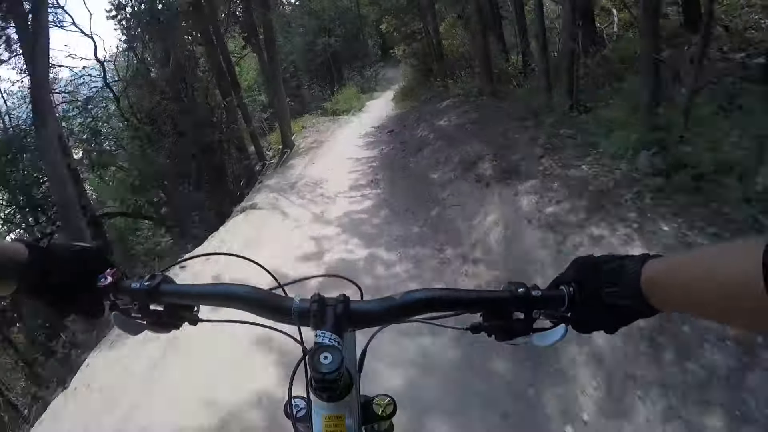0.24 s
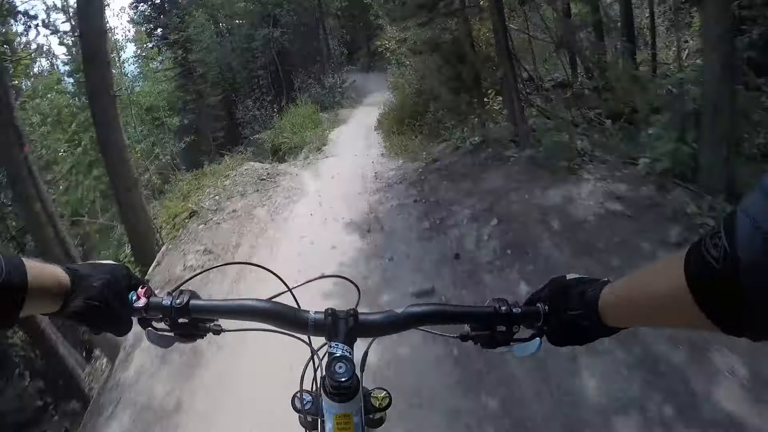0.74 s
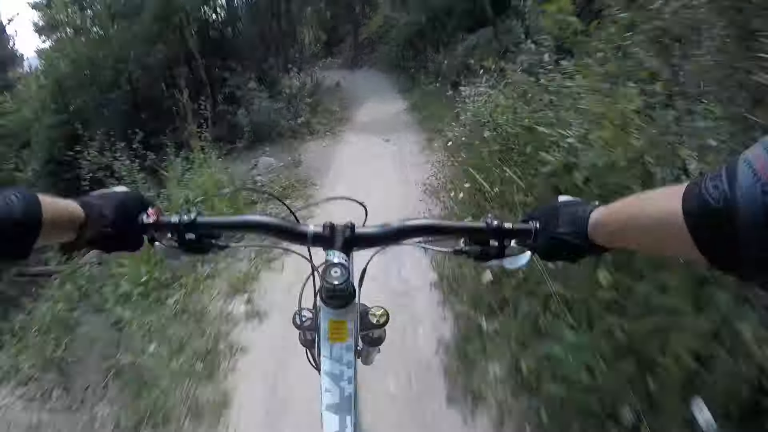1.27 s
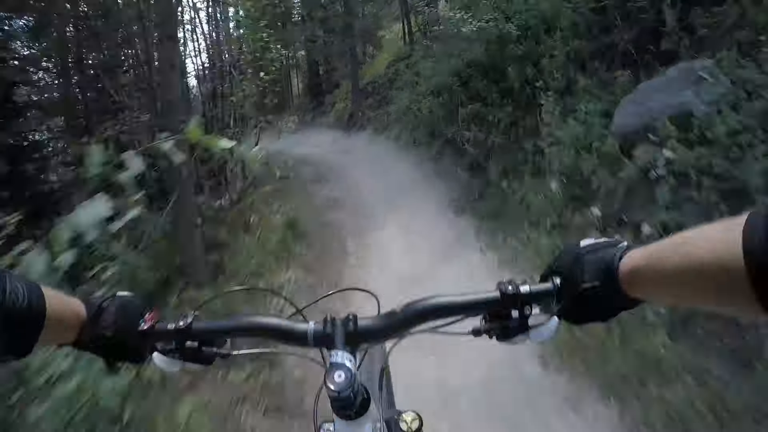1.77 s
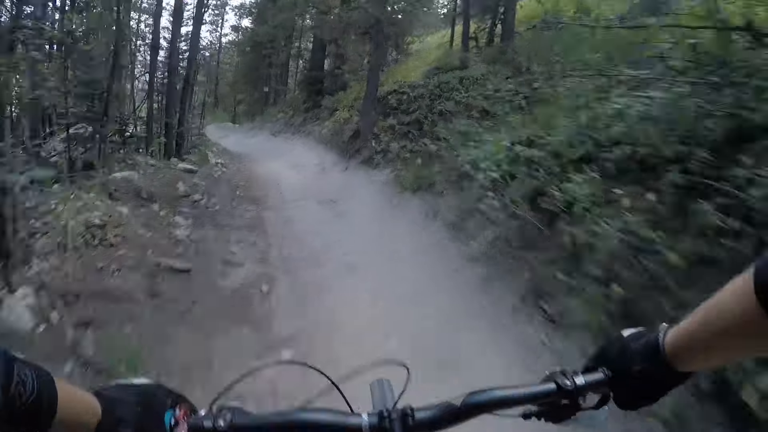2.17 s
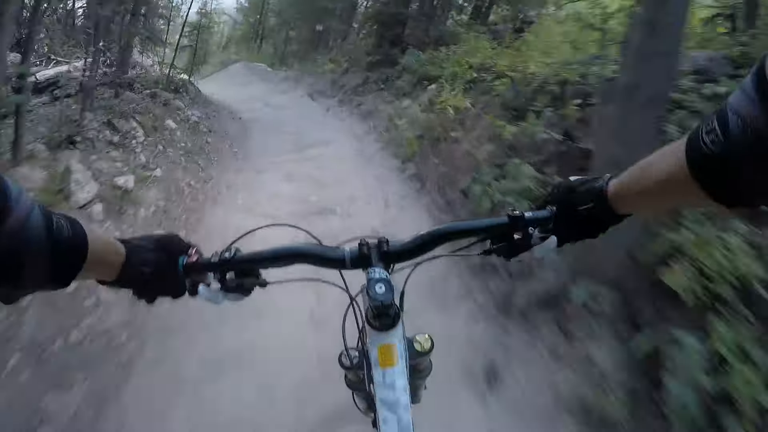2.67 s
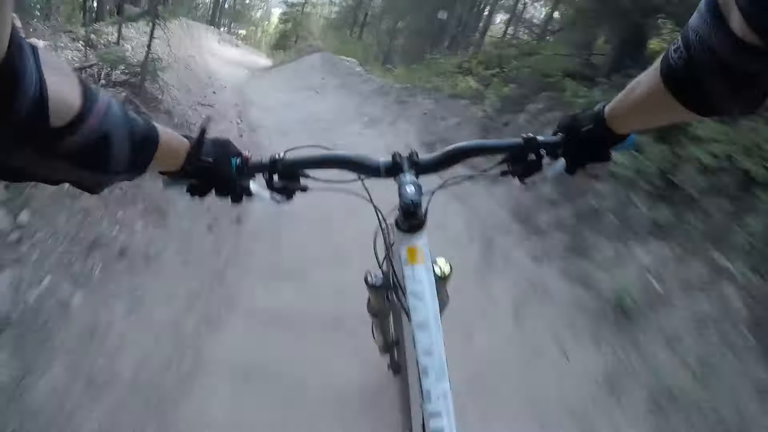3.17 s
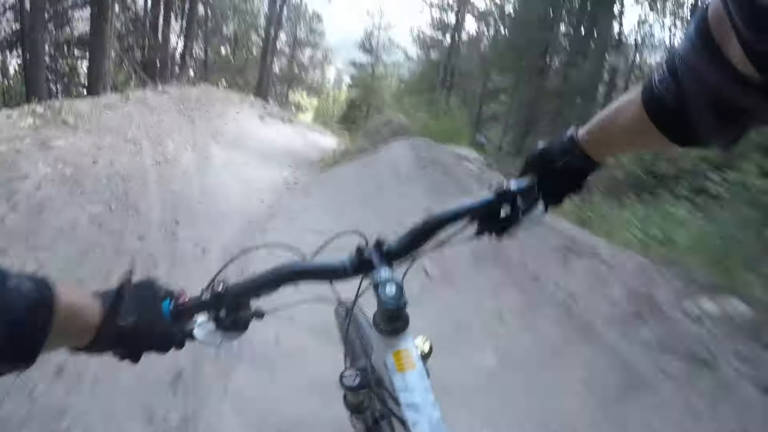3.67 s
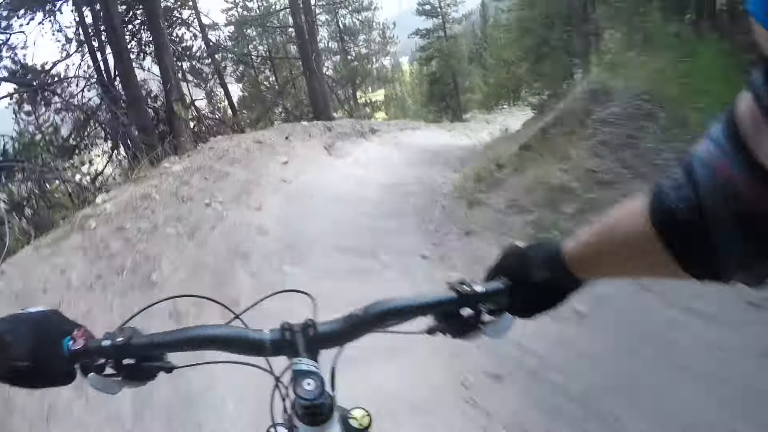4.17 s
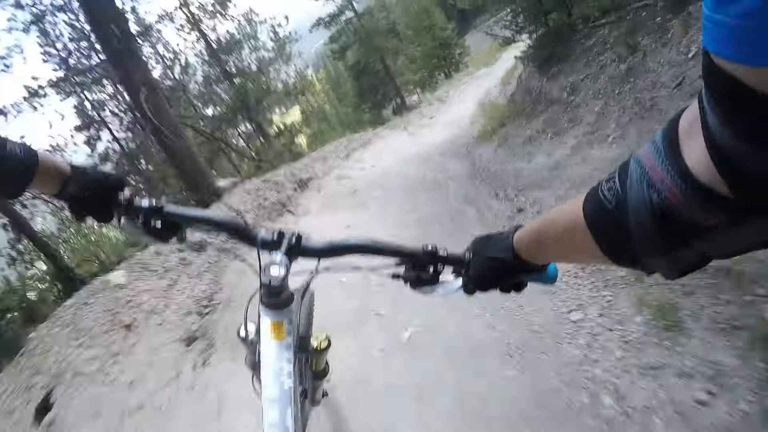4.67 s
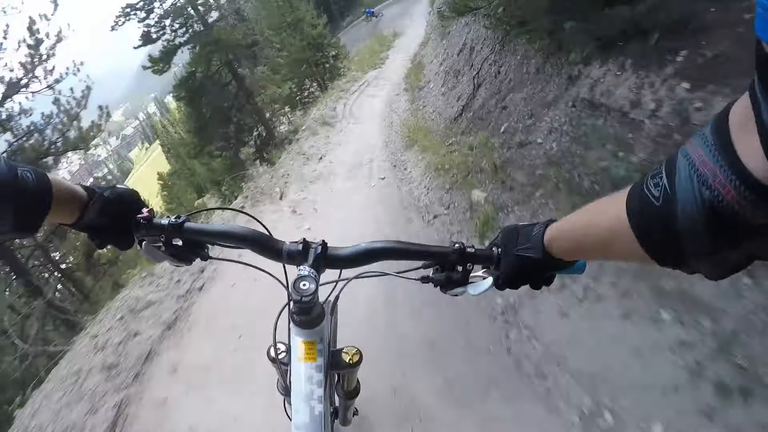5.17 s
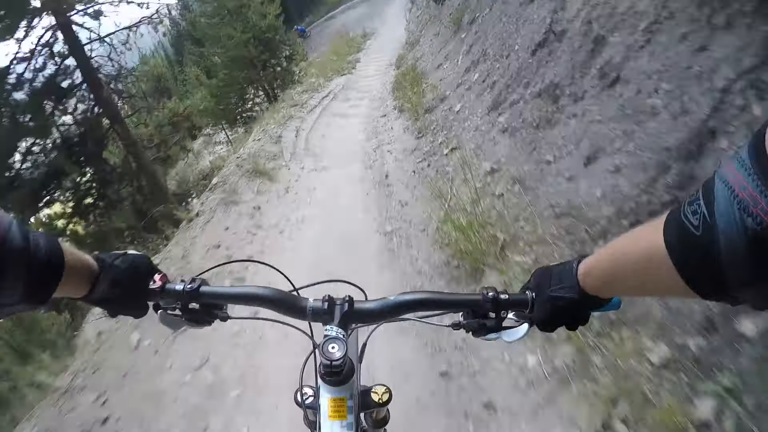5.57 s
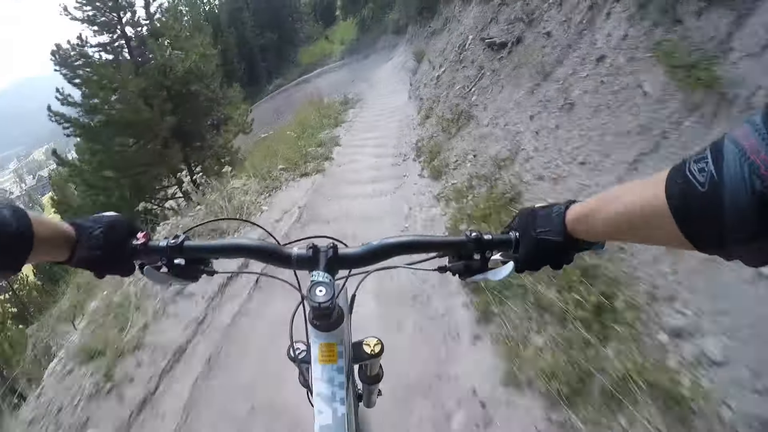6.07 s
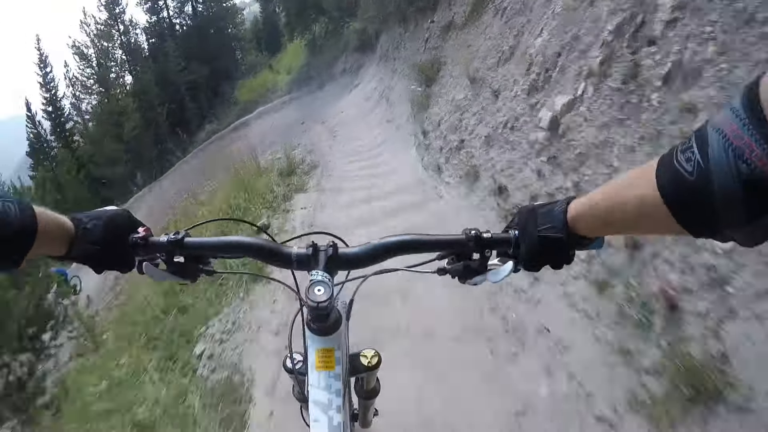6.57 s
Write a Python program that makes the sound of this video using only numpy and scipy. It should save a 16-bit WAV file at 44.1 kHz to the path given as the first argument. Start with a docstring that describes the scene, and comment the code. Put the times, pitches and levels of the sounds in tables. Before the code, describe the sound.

A mountain bike runs fast down a dirt trail, heard from a cased camera on the rider's chest. Shaking and wind rumble on the microphone while the tyres crunch over grit. Bumps make the chain rattle and the parts clack. Early on, a short hop ends in a heavy thump and a brief lull. The clatter then returns, with one especially hard clack, and the wind rises at the end.

```python
"""A mountain bike runs fast down a dirt trail, heard from a cased camera on the rider's chest.
From the start, body shake and air rumble on the case and the tyres crunch over grit.
Bumps clack the bike's parts, rattle the chain, knock the camera mount and jolt the rider.
The tyres go quiet in a short hop at 1.5 s; the landing thumps into overload at 1.8 s, then a lull.
Rough ground resumes by 2.7 s, the hardest clack comes at 4.7 s, and the air rush rises at the end."""
import sys
import numpy as np
from scipy import signal
from scipy.fft import rfft, irfft, next_fast_len
from scipy.io import wavfile
from scipy.ndimage import map_coordinates

SR = 44100
rng = np.random.default_rng(int(sys.argv[2]) if len(sys.argv) > 2 else 0)


def unload_wav(signal):
    """Save mono or channel-first audio to the path in sys.argv[1] as 16-bit WAV at rate SR, clipped to [-1, 1]."""
    wavfile.write(
        sys.argv[1],
        SR,
        np.round(np.clip(np.atleast_2d(signal).T, -1, 1) * 32767).astype(np.int16),
    )


N = 300762

# tyre bite and looseness of the gravel: t/s, bite/dB, loose/dB
TRAIL = [(0.0, 0, 2.5), (0.2, -7, 2.5), (0.8, -1, 0), (1.05, -5.5, 1.5), (1.2, 2, 1), (1.35, 5, -4),
         (1.49, -8.5, 0), (1.75, 6.5, -2), (1.98, -7, -4.5), (2.6, -3, 2.5), (2.79, 5.5, 2), (3.1, 1, 3),
         (3.28, 8, -3.5), (3.45, 0.5, 2), (4.49, -1, -0.5), (4.63, 7, -4.5), (4.86, -1.5, 0.5),
         (5.08, 2.5, -0.5), (5.34, -4, -0.5), (5.68, -3, 2), (6.1, -1.5, -1), (6.52, 4, 4), (6.82, 5, 1.5)]
# bumps that swing the rider's chest: t/s, level/dB
BUMPS = [(0.01, -15), (0.49, -19), (0.87, -17.5), (1.22, -11.5), (1.62, -14), (1.79, -7.5), (2.35, -18),
         (2.72, -7), (3.13, -9.5), (3.25, -7.5), (3.48, -14), (3.67, -8.5), (3.89, -21), (4.14, -10),
         (4.27, -22), (4.59, -9.5), (4.72, -9), (4.98, -9), (5.22, -13.5), (5.57, -12.5), (5.79, -21),
         (5.98, -13.5), (6.17, -20.5), (6.29, -11.5), (6.43, -5.5), (6.56, -13), (6.78, -5)]
# gusts on the case: t/s, level/dB
GUSTS = [(1.16, -18.5), (1.29, -25), (1.78, -9.5), (2.35, -31.5), (2.8, -19.5), (3.13, -21), (3.8, -37),
         (4.46, -26.5), (4.59, -23.5), (4.98, -26), (5.74, -26), (5.87, -24.5), (6.12, -32.5), (6.4, -26),
         (6.81, -22)]
# air rush past the case: t/s, level/dB
AIR_RUSH = [(0.0, -48), (1.3, -49.5), (1.8, -48.5), (1.99, -63.5), (2.4, -50), (2.76, -44.5), (2.98, -49),
            (5.1, -50), (5.3, -45), (6.66, -46.5), (6.82, -37)]
# tyre scuffs: centre t/s, length/s, boost/dB
SCUFFS = [(1.707, 0.059, 6.5), (2.678, 0.016, 5), (3.063, 0.038, 5), (3.204, 0.018, 8)]
# cables and stones on the frame: t/s, level/dB, f/Hz, crack level/dB
CLACKS = [(0.045, -37, 2060, -43), (1.2271, -15.5, 1970, -48), (1.258, -27, 2060, -56),
          (1.357, -24, 2070, -50), (1.427, -33, 1730, -50), (1.7875, -20.5, 2150, -21.5),
          (1.838, -21, 1890, -39), (1.8972, -25.5, 1910, -40), (1.9637, -45, 1720, -49.5),
          (2.7512, -24, 2020, -39), (2.8378, -27, 1960, -37), (3.035, -33, 1740, -37),
          (3.1557, -22, 1970, -40), (3.2226, -23.5, 1670, -40), (3.2666, -17, 1750, -34),
          (3.3662, -24, 2030, -38), (3.4535, -25, 2500, -42), (3.5702, -27.5, 2240, -46),
          (3.8338, -26.5, 2060, -45), (3.906, -34, 1760, -54), (4.288, -27, 1860, -56),
          (4.5215, -22.5, 1860, -62), (4.6339, -21.5, 1950, -48), (4.7016, -2, 1950, -19),
          (4.779, -23, 1900, -41.5), (5.043, -19.5, 2130, -37), (5.3347, -37, 1900, -59)]
# chain slaps: t/s, level/dB, jingle level/dB
CHAIN_SLAPS = [(0.2457, -31.5, -51), (0.897, -26.5, -44.5), (1.6925, -20.5, -43.5), (1.8786, -44, -45.5),
               (1.928, -33, -66), (2.7037, -23, -44), (2.7678, -19, -35.5), (2.8261, -23.5, -52),
               (2.8993, -29, -46), (3.038, -28, -44), (3.276, -18, -36), (3.304, -13, -31),
               (3.356, -18.5, -41), (3.3936, -30, -42), (3.5184, -31.5, -44), (3.7667, -22, -47),
               (3.846, -27.5, -49.5), (4.0765, -31, -48.5), (4.24, -33, -53), (4.5592, -30, -50),
               (4.8389, -32, -48), (5.022, -24.5, -54), (5.1874, -28, -49), (5.884, -39, -52.5),
               (6.1435, -30, -47), (6.341, -17.5, -37.5), (6.418, -20.5, -40), (6.4422, -18.5, -40),
               (6.4705, -18.5, -38), (6.4955, -8, -35), (6.538, -15, -34), (6.6187, -24.5, -48),
               (6.6998, -21, -42), (6.779, -22.5, -38.5)]
# camera mount knocks: t/s, level/dB, f/Hz, body level/dB
KNOCKS = [(0.646, -20.5, 835, -30.5), (1.117, -37, 990, -43), (1.146, -26.5, 824, -30),
          (1.273, -17.5, 934, -23), (1.318, -26.5, 814, -31), (1.686, -28.5, 1150, -38.5),
          (1.708, -25, 1230, -33), (1.742, -17.5, 840, -43), (1.749, -18, 1060, -45),
          (1.782, -12.5, 1080, -19.5), (1.786, -18, 1000, -17), (2.003, -43, 1140, -54),
          (3.543, -45, 785, -40.5), (4.121, -34, 840, -37.5), (4.202, -24, 900, -33),
          (4.683, -31.5, 1150, -34.5), (4.702, -42, 795, -30.5), (4.769, -27.5, 840, -33),
          (4.819, -28, 930, -45), (4.941, -30.5, 1060, -38.5), (5.032, -29.5, 1130, -38),
          (5.07, -16.5, 950, -34), (5.127, -28, 1030, -34), (5.442, -28, 896, -44),
          (5.599, -29.5, 890, -45), (6.2, -20.5, 930, -45), (6.309, -23, 920, -42), (6.681, -24, 920, -40)]
# jolts of the rider's body: t/s, level/dB, start f/Hz
JOLTS = [(0.839, -14, 39.7), (1.281, -20, 129), (1.758, -11, 192), (1.784, -1.5, 81.5), (2.81, -6.5, 66),
         (2.863, -29.5, 170), (4.709, -5.5, 36.4)]

# noise spectra of body shake, air, tyres and contact cracks: f/Hz, level/dB
SHAKE_SPECTRUM = [(8, -13), (15, -2.5), (23, 4), (32, -6), (48, -14.5), (65, -17), (100, -11), (200, -63)]
BUFFET_SPECTRUM = [(30, -36), (55, 8), (75, -3), (110, -4), (160, -23), (260, -22)]
WIND_SPECTRUM = [(60, -21), (120, 2.5), (190, -1.5), (300, -11), (450, -14.5), (700, -20), (1500, -26),
                 (4000, -80)]
TREAD_SPECTRUM = [(150, -11), (350, -3.5), (600, -0.5), (1000, -1), (1500, 3), (1900, -5.5), (2600, -4),
                  (5000, -40)]
CRUNCH_SPECTRUM = [(1200, -20), (1900, -10.5), (2300, 4.5), (2550, 1.5), (2850, -6), (3130, 0),
                   (3380, -2.5), (3680, 0), (3950, -14), (4300, -17.5), (6000, -70)]
GRIT_SPECTRUM = [(3000, 0), (4200, -1.5), (4700, 5.5), (5150, -0.5), (5600, 1.5), (6200, -2), (7500, -0.5),
                 (8900, -8.5), (9450, -9.5), (9900, -2.5), (10900, -6), (12200, -5), (13700, -15),
                 (14900, -7), (15600, -22)]
CRACK_SPECTRUM = [(300, -35), (1500, 23.5), (3600, 11.5), (5000, 1), (8000, -6.5), (11000, -15),
                  (15500, -23)]
# chain and spoke resonances: f/Hz, width/Hz, level/dB
STEEL_MODES = [(4710, 500, 6), (5670, 550, 3), (6820, 300, 1.5), (7420, 160, -18.5), (7360, 280, 3),
               (8720, 1100, -4.5), (9860, 530, 1), (11680, 400, -3), (12300, 710, -2.5), (13800, 910, -37)]
# camera case resonances: f/Hz, width/Hz, level/dB
CASE_MODES = [(2230, 405, 1.5), (2580, 290, 1), (2996, 198, 4.5), (3620, 260, 2)]
# camera mount resonances: f/Hz, level/dB, rise/cycles
MOUNT_MODES = [(212.3, -3.5, 0.8), (408, -1.5, 0.6), (596, -3.5, 0.68)]


def amp(db):
    """Decibels to gain."""
    return 10 ** (np.asarray(db) / 20)


def unit(x):
    """Scale to rms 1."""
    return x / np.sqrt(np.mean(x ** 2) + 1e-20)


def crest(x):
    """Scale to peak 1."""
    return x / (np.abs(x).max() + 1e-20)


def noise(n=N):
    """White noise."""
    return rng.standard_normal(n)


def curves(rows):
    """Each column after t/s, interpolated per sample."""
    times_s, *cols = np.transpose(rows)
    return [np.interp(np.arange(N) / SR, times_s, col) for col in cols]


def wobble(rate_hz):
    """Smooth random curve, knots at rate_hz."""
    return map_coordinates(noise(int(N * rate_hz / SR) + 4), [np.arange(N) * rate_hz / SR])


def grains(rate_hz, spread_db):
    """Random impulses of uneven size, rms 1."""
    return unit((rng.random(N) < rate_hz / SR) * amp(spread_db * rng.uniform(-0.97, 1, N)))


def filtered(x, response):
    """Apply a complex frequency response."""
    size = next_fast_len(len(x) + SR // 5)
    return irfft(rfft(x, size) * response(np.fft.rfftfreq(size, 1 / SR)), size)[:len(x)]


def coloured(x, spectrum):
    """Shape by (f/Hz, level/dB) points, rms 1."""
    points_hz, db = np.transpose(spectrum)
    return unit(filtered(x, lambda hz: amp(np.interp(np.log(hz + 1), np.log(points_hz + 1), db))))


def resonant(x, modes):
    """Parallel resonators of alternating sign, rms 1."""
    def response(hz):
        return sum((-1) ** k * amp(db) * 1j * hz * width_hz / (mode_hz**2 - hz**2 + 1j * hz * width_hz)
                   for k, (mode_hz, width_hz, db) in enumerate(modes))
    return unit(filtered(x, response))


def swell(t, rise_s):
    """Envelope: peaks at 1 after rise_s, then dies."""
    u = np.maximum(t, 0) / rise_s
    return (u * np.exp(1 - u)) ** 2


def strike(t, rise_s, t60_s):
    """Envelope: fast attack, exponential decay."""
    return (1 - np.exp(-t / rise_s)) * amp(-60 * t / t60_s)


def surges(events, rise_s, decay_s):
    """Gain that rises to each (t/s, level/dB) event and decays."""
    t = np.arange(N) / SR
    peaks = (amp(db) * np.exp(-np.maximum((at_s - t) / rise_s, (t - at_s) / decay_s))
             for at_s, db in events)
    return np.sqrt(sum(peak ** 2 for peak in peaks))


def ping(t, hz, cycles):
    """Damped mode that peaks after the given cycles."""
    return swell(t, cycles / hz) * np.sin(2 * np.pi * hz * t)


def add(track, at_s, sound):
    """Mix sound into track at at_s."""
    part = track[round(at_s * SR):][:len(sound)]
    part += sound[:len(part)]


def lumps(spectrum):
    """Low random rumble, its loudness partly evened out."""
    swing = signal.hilbert(coloured(noise(), spectrum))
    return unit(swing.real / (np.abs(swing) + 1.17))


def rumble():
    """The camera sways on the chest; gusts buffet it; air rushes past."""
    bite_db, _ = curves(TRAIL)
    air_db, = curves(AIR_RUSH)
    lull_db = np.interp(np.arange(N) / SR, [1.776, 2.016, 2.336], [0, -21.5, 0])  # after the landing
    bumps = surges(BUMPS, rise_s=0.024, decay_s=0.05)
    gusts = surges(GUSTS, rise_s=0.014, decay_s=0.02)
    sway_gain = np.hypot(amp(-23.5 + 0.65 * bite_db + 3 * wobble(12)), bumps)
    buffet_gain = np.hypot(amp(-37 + 0.29 * bite_db), gusts)
    air_gain = np.hypot(amp(air_db), amp(-20.5) * gusts)
    sway = coloured(lumps(SHAKE_SPECTRUM), [(60, 13.5), (100, -20.5), (180, -64)])
    eddies = lumps(BUFFET_SPECTRUM) * amp(3.7 * wobble(16))
    buffet = coloured(eddies, [(140, -7), (220, -8), (400, -64)])
    air = unit(coloured(noise(), WIND_SPECTRUM) * amp(1.34 * wobble(30)))
    fizz = amp(air_db - 17.5) * coloured(noise(), GRIT_SPECTRUM)
    return amp(lull_db) * (sway_gain * sway + buffet_gain * buffet) + air_gain * air + fizz


def tyre_levels_db():
    """All layers follow the bite; loose gravel adds crunch and grit."""
    bite_db, loose_db = curves(TRAIL)
    tread_db = -50.5 + 1.31 * bite_db
    crunch_db = -46.5 + 0.79 * bite_db + loose_db
    grit_db = -61.5 + 1.41 * bite_db + loose_db
    return tread_db, crunch_db, grit_db


def gravel(crunch_db):
    """A harder bite cracks single stones out of the hiss."""
    coarse = amp(0.29 * (crunch_db + 43)).clip(0, 1.5)
    return unit(noise() + coarse * grains(450, spread_db=3.5))


def tyres():
    """Knobs roar on packed dirt and crush grit in clumps; scuffs briefly bite harder."""
    tread_db, crunch_db, grit_db = tyre_levels_db()
    t = np.arange(N) / SR
    scuff_db = sum(db * np.exp(-(2 * (t - at_s) / length_s) ** 4) for at_s, length_s, db in SCUFFS)
    clumps = wobble(55)
    tread = unit(coloured(gravel(crunch_db), TREAD_SPECTRUM) * amp(2.04 * clumps + 3.8 * wobble(45)))
    crunch = unit(coloured(gravel(crunch_db), CRUNCH_SPECTRUM) * amp(1.6 * clumps + wobble(180)))
    grit = unit(coloured(noise(), GRIT_SPECTRUM) * amp(1.8 * clumps + wobble(100)))
    return amp(scuff_db) * (amp(tread_db) * tread + amp(crunch_db) * crunch) + amp(grit_db) * grit


def pebbles():
    """Pebbles tap the frame and tick on the spokes, harder as the tyres bite."""
    tread_db, _, grit_db = tyre_levels_db()
    t = np.arange(SR // 30) / SR
    taps = signal.fftconvolve(grains(24, spread_db=7.5), ping(t, hz=1660, cycles=1))[:N]
    sprays = signal.fftconvolve(grains(30, spread_db=9.5), swell(t, rise_s=0.003))[:N] * noise()
    spokes = amp(grit_db - 2) * resonant(sprays, STEEL_MODES)
    case = amp(grit_db + 2) * resonant(sprays, CASE_MODES)
    return amp(tread_db - 6.5) * unit(taps) + spokes + case


def frame_clacks():
    """Hard contacts: a crack, a few cycles of stiff plastic, a faint frame ring."""
    out, t = np.zeros(N), np.arange(SR // 6) / SR
    for at_s, db, hz, crack_db in CLACKS:
        blow = (ping(t, hz, cycles=1.9)
                + amp(-10.5) * ping(t, 1.289 * hz, cycles=6.1)
                + amp(-4) * ping(t, 0.663 * hz, cycles=1))
        shiver = resonant(noise(len(t)), CASE_MODES) * strike(t, rise_s=0.00077, t60_s=0.023)
        plastic = crest(blow + amp(-7.5) * shiver)
        ring = np.sin(2 * np.pi * 1855 * t) * amp(-28 - 60 * t / 0.19)
        crack = coloured(noise(len(t)), CRACK_SPECTRUM) * swell(t, rise_s=0.0019)
        add(out, at_s, amp(db + 1) * (plastic + ring) + amp(crack_db + 10) * crack)
    return out


def chain_chatter(count, spread_db):
    """Faint random slaps, louder on rough ground; rows as in CHAIN_SLAPS."""
    slot, size, shine = rng.random((count, 3)).T
    at = ((np.arange(count) + slot) / count * N).astype(int)
    bite_db, loose_db = curves(TRAIL)
    rough_db = 1.76 * (bite_db + loose_db)[at] + spread_db * (2 * size - 1)
    jingle_db = -56 + rough_db + spread_db * (shine - 0.5)
    return list(zip(at / SR, -37 + rough_db, jingle_db))


def chain_rattles():
    """Links strike in a quick cluster, ringing the case under a steel jingle."""
    out, t = np.zeros(N), np.arange(SR // 12) / SR
    for at_s, db, jingle_db in CHAIN_SLAPS + chain_chatter(count=60, spread_db=9):
        cluster = swell(t, rise_s=0.0022) + 0.34 * swell(t, rise_s=0.0081)
        links = noise(len(t)) * cluster
        lead_hz = 3120 * np.exp(0.014 * rng.standard_normal())
        lead_link = np.sin(2 * np.pi * lead_hz * t) * strike(t, rise_s=0.00015, t60_s=0.04)
        ring = crest(crest(resonant(links, CASE_MODES)) + 0.65 * lead_link)
        modes = [(hz, width_hz, mode_db + 3 * rng.standard_normal())
                 for hz, width_hz, mode_db in STEEL_MODES]
        jingle = crest(resonant(links, modes))
        add(out, at_s, amp(db + 0.5) * ring + amp(jingle_db + 10) * jingle)
    return out


def mount_knocks():
    """The mount takes up its play: hollow tock, slower body, brief shudder."""
    out, t = np.zeros(N), np.arange(SR // 12) / SR
    for at_s, db, hz, body_db in KNOCKS:
        detunes = np.exp(0.12 * rng.standard_normal(len(MOUNT_MODES)))
        tock = crest(ping(t, hz, cycles=1.83) + amp(-6) * ping(t, hz=1226, cycles=1.9))
        body = sum(amp(mode_db) * ping(t - 0.001, mode_hz * detune, cycles)
                   for (mode_hz, mode_db, cycles), detune in zip(MOUNT_MODES, detunes))
        shudder = coloured(noise(len(t)), TREAD_SPECTRUM) * strike(t, rise_s=0.0012, t60_s=0.039)
        add(out, at_s, amp(db + 2.5) * (tock + amp(-13.5) * shudder) + amp(body_db + 9.5) * crest(body))
    return out


def body_jolts(end_hz=22, glide_s=0.015):
    """A hard compression shoves the camera; the swing slows as it dies."""
    out, t = np.zeros(N), np.arange(SR // 4) / SR
    for at_s, db, start_hz in JOLTS:
        hz = end_hz + (start_hz - end_hz) * np.exp(-t / glide_s)
        swing = np.sin(2 * np.pi * np.cumsum(hz) / SR) * strike(t, rise_s=0.0025, t60_s=0.22)
        add(out, at_s, -amp(db) * crest(swing))
    return out


def scene():
    """All sources reach one microphone through the case."""
    mix = rumble() + tyres() + pebbles() + frame_clacks() + chain_rattles() + mount_knocks() + body_jolts()
    return mix[None]


def record(dry):
    """The camera soft-clips overloads and limits the band."""
    ceiling, top_hz = 0.97, 15600
    clipped = dry[0] / (1 + np.abs(dry[0] / ceiling) ** 6) ** (1 / 6)
    return filtered(clipped, lambda hz: hz < top_hz)[None]


dry = scene()
out = record(dry)
unload_wav(out)
```